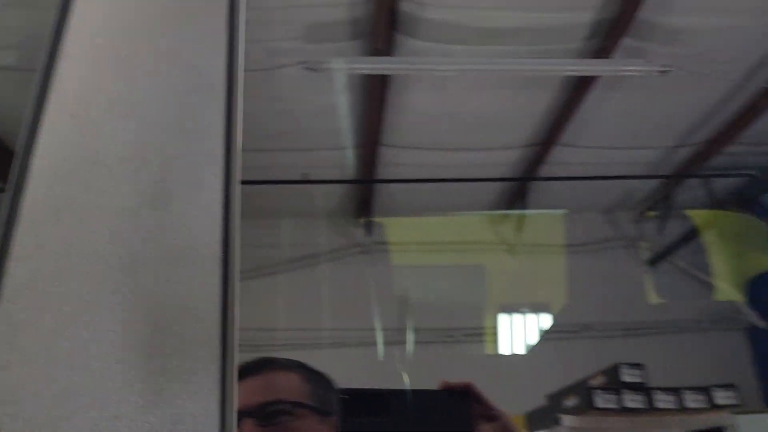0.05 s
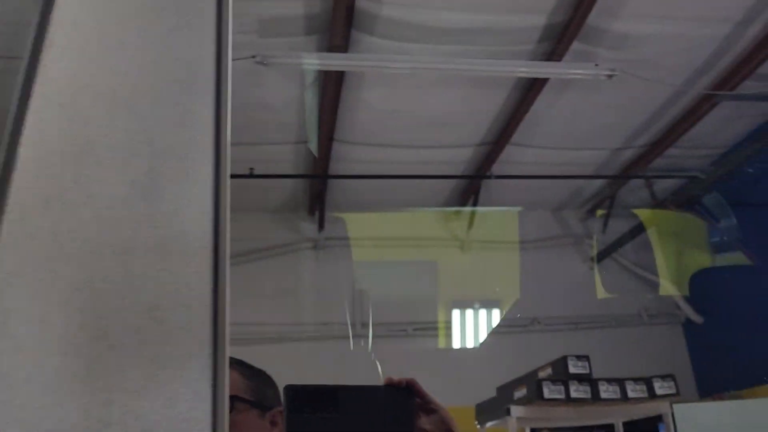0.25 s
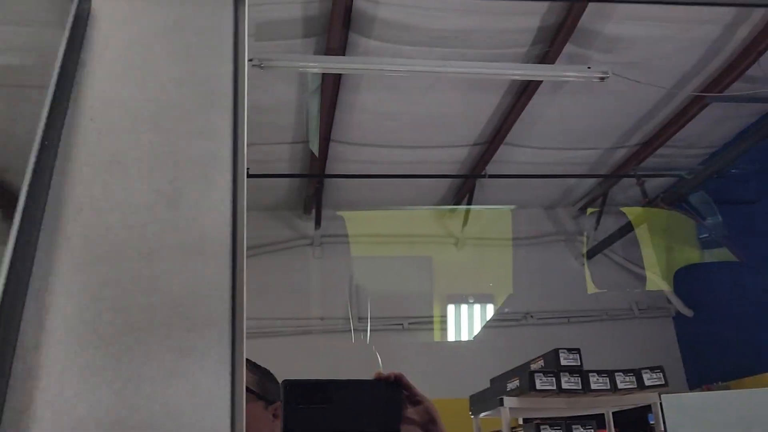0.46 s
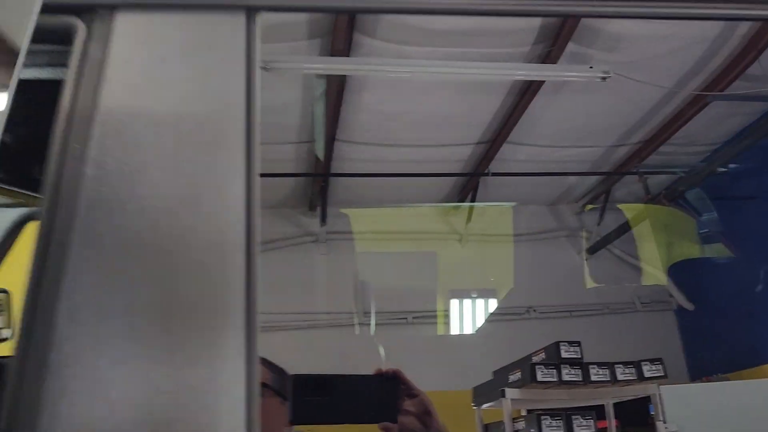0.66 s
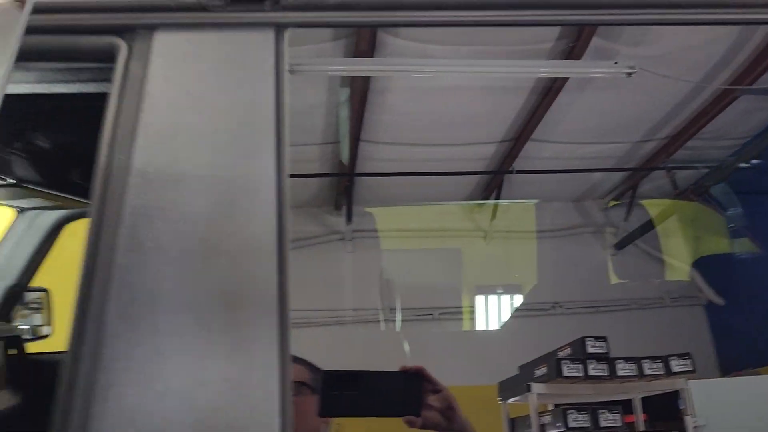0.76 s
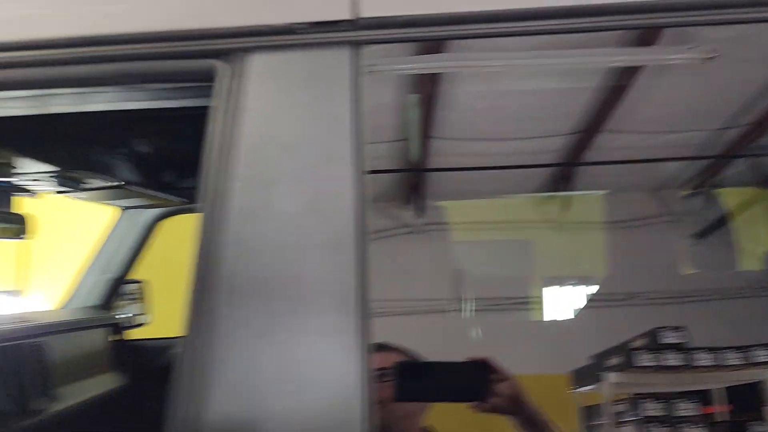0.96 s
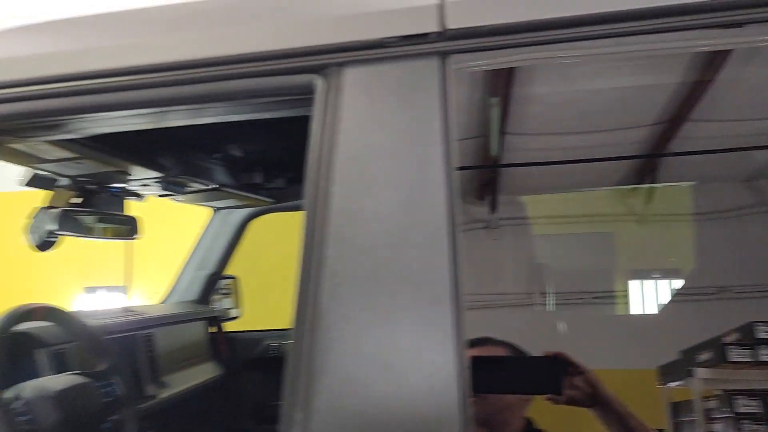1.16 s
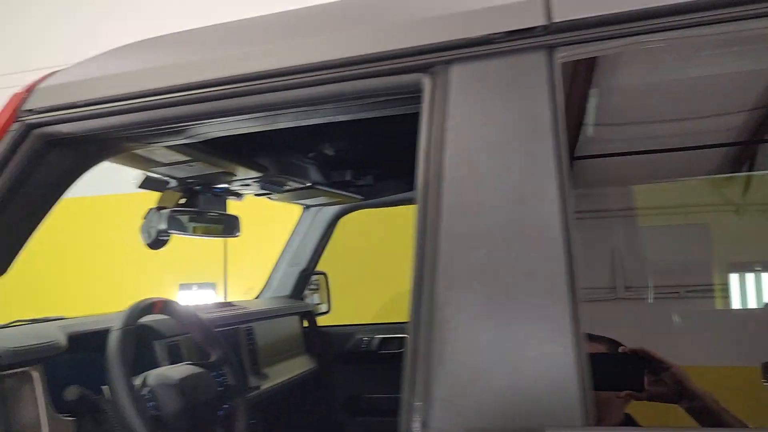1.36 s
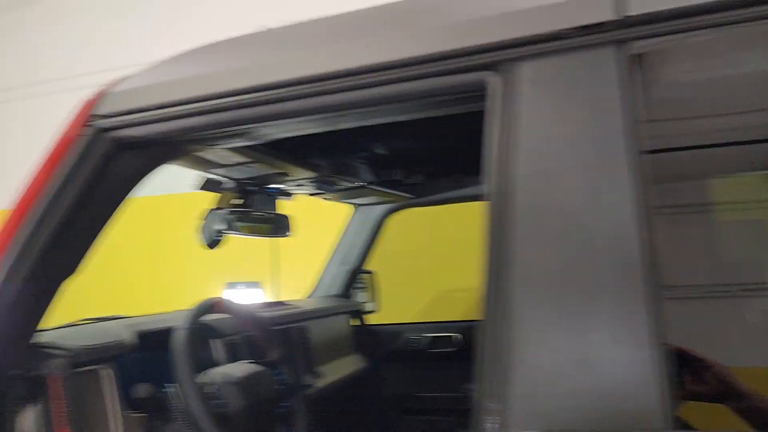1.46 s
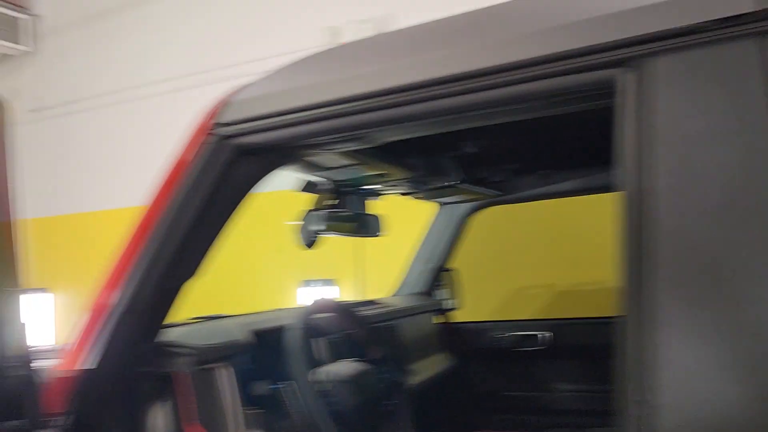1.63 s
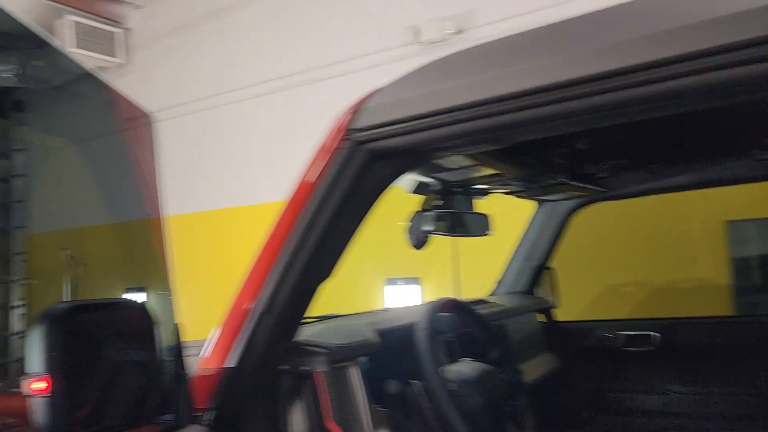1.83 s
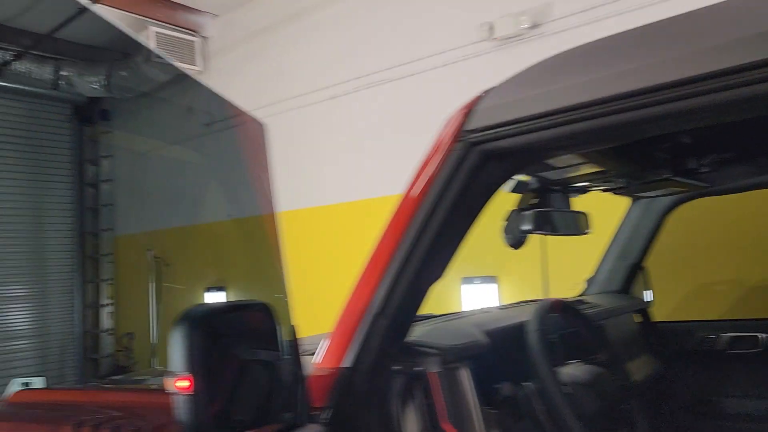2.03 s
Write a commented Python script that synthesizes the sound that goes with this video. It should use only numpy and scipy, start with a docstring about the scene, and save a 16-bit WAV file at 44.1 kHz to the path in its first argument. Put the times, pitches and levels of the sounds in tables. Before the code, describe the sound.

Close up in a humming, echoing workshop, a car door is pulled open. Small handle clicks lead to one loud metallic clunk with a low thump, then the door swings with soft rubbing and a small clack.

```python
"""A workshop with a steel-roofed hall's echo, the microphone close to a vehicle door being pulled open.
Over the ventilation hum the handle ticks, then the latch lets go with a thump and a steel crack;
the door panel rings on and the air in the cabin booms. The rubber seal peels off with a faint squeak,
and the door swings with a dry rub and a light rustle and bumps over its check strap."""
import sys
import numpy as np
from scipy import signal
from scipy.fft import rfft, irfft
from scipy.io import wavfile
from scipy.ndimage import uniform_filter1d

SR = 44100
rng = np.random.default_rng(int(sys.argv[2]) if len(sys.argv) > 2 else 0)


def master(y):
    """Save y as 16-bit WAV."""
    cut = np.clip(np.atleast_2d(y).T, -1, 1)
    pcm = np.round(cut * 32767)  # scale
    wavfile.write(sys.argv[1], SR, pcm.astype(np.int16))


N = 92257
TIME = np.arange(N) / SR
HZ = np.fft.rfftfreq(2 * N, 1 / SR)


def amp(db):
    """Decibels to gain."""
    return 10 ** (np.asarray(db) / 20)


def read(points, hz=HZ):
    """A table read on a log-frequency axis."""
    f, value = np.transpose(points)
    return np.interp(np.log(hz + 1), np.log(f + 1), value)


def add(mix, start_s, sound):
    """Mixes a sound in at its start time."""
    at = round(start_s * SR)
    sound = sound[..., max(-at, 0):]
    part = mix[:, max(at, 0):][:, :sound.shape[-1]]
    part += sound[..., :part.shape[1]]


def unit_rms(x):
    """Scales to an rms of 1."""
    return x / np.sqrt(np.mean(x ** 2) + 1e-20)


def unit_energy(x):
    """Scales each channel to an energy of 1."""
    return x / np.sqrt((x ** 2).sum(-1, keepdims=True) + 1e-20)


def hill(centre_hz, width):
    """The dB curve of a resonance; width is a share of its centre."""
    return -20 * np.log10(1 + (np.log((HZ + 1) / centre_hz) / width) ** 2)


def level(times, db):
    """Gain along a level curve, silent outside it."""
    return amp(np.interp(TIME, times, db, left=-np.inf, right=-np.inf))


# How alike the two sides are at the microphone. Each row: frequency in Hz, likeness from 0 to 1.
LIKENESS = [(40, 1), (150, 1), (280, 0.82), (550, 1), (1000, 0.29), (2000, 0.033), (16000, 0.017)]
def noise(db):
    """Two channels of coloured noise, alike in the bass."""
    left, other = rfft(rng.standard_normal((2, 2 * N)))
    same = np.clip(read(LIKENESS), 0, 1)
    right = same * left + np.sqrt(1 - same ** 2) * other
    return unit_rms(irfft(np.array([left, right]) * amp(db))[:, :N])


def burst(db, t60):
    """Fast-fading noise: a dense cluster of quickly dying modes."""
    return unit_energy(noise(db)[:, :SR] * amp(-60 * TIME[:SR] / t60))


def tail(db, t60s, rise_s):
    """A diffuse ring that swells and dies at its own speed in each band."""
    hz, t, bands = signal.stft(noise(db), SR, nperseg=512)
    decay = amp(-60 * t / read(t60s, hz)[:, None])
    fading = signal.istft(bands * decay, SR, nperseg=512)[1][:, :N]
    return unit_energy(fading * (1 - np.exp(-TIME / rise_s)))


def ring(modes, dull_db=0):
    """Struck modes; a soft blow favours the low ones by dull_db per octave."""
    t = TIME[:SR]
    return sum(amp(db - dull_db * np.log2(hz / 300) - 60 * t / t60) * np.sin(2 * np.pi * hz * t)
               for hz, db, t60 in modes)


def arch(length_s, peak_share=0.19):
    """A smooth, quick swell and a slower fade."""
    progress = np.arange(int(length_s * SR)) / (length_s * SR)
    return np.sin(np.pi / 2 * np.interp(progress, [0, peak_share, 1], [0, 1, 0]))


def rub(length_s, db, grain_db=2.5, grain_s=0.002):
    """Grainy friction under one stroke."""
    stroke = arch(length_s)
    grain = unit_rms(uniform_filter1d(rng.standard_normal(N), int(grain_s * SR)))
    friction = noise(db) * amp(grain_db * grain)
    return stroke * unit_rms(friction[:, :len(stroke)])


# Ventilation, all round the microphone. Each row: frequency in Hz, relative level in dB.
VENTILATION = [(18, -29), (35, -3.5), (55, 1.5), (95, -2), (130, -0.5), (180, -10.5), (260, -11),
               (350, -17.5), (470, -26.5), (620, -25), (800, -23.5), (1100, -29.5), (1550, -26),
               (1780, -30.5), (2050, -29), (2500, -37.5), (4200, -41.5), (5500, -51), (8000, -48),
               (11500, -62.5), (16000, -60)]
# Machine tones in the background. Each row: frequency in Hz, level in dB.
MACHINE_TONES = [(120, -52.5), (174, -57.5), (299, -63.5), (388, -64), (1001, -63), (1631, -66),
                 (2003, -71.5), (2998, -82)]
def workshop():
    """Room tone: ventilation rumble with faint, wavering machine tones."""
    out = amp(-42) * noise(read(VENTILATION))
    for hz, db in MACHINE_TONES:
        waver = np.interp(TIME, np.linspace(0, TIME[-1], 16), np.cumsum(rng.standard_normal(16)))
        out += amp(db) * np.sqrt(2) * np.sin(2 * np.pi * hz * TIME + 0.84 * waver)
    return out


# Handling, close up. Each row: start and length in seconds, level in dB, treble lift in dB per octave.
RUSTLE_STROKES = [(-.05, 0.33, -62, 2.5), (.14, 0.06, -61, 4), (0.315, 0.069, -41.5, 2.5),
                  (0.396, 0.045, -43.5, -7), (0.492, 0.018, -42.5, -8), (1.199, 0.084, -45, -4.5),
                  (1.239, .16, -58.5, 4), (1.575, .04, -71, -14), (1.673, 0.074, -64.5, 4.5),
                  (1.878, 0.042, -60, 0.5)]
# Colour of a rustle. Each row: frequency in Hz, relative level in dB.
RUSTLE_COLOUR = [(200, -3), (600, 6), (1200, -11.5), (2000, -1), (3000, -12), (7500, -21), (12500, -24.5),
                 (15500, -21.5)]
def rustles():
    """Light strokes of friction as the door is handled."""
    out = np.zeros((2, N))
    for start, length, db, lift_db in RUSTLE_STROKES:
        colour = read(RUSTLE_COLOUR) + lift_db * np.log2(1 + HZ / 4000)
        add(out, start, amp(db) * rub(length, colour))
    return out


# The linkage. Each row: start in seconds, level in dB, body resonance in Hz, snap against body in dB.
LINKAGE_TICKS = [(0.2969, -26.5, 5370, -8), (0.3079, -30, 7000, 10), (0.3183, -14.5, 1750, -1),
                 (0.3295, -32, 4000, 9), (0.3339, -24.5, 5800, 4), (0.342, -31, 4250, 11),
                 (.3530, -19.5, 2000, -0.5)]
# The snap of a tick. Each row: frequency in Hz, relative level in dB.
SNAP_COLOUR = [(1000, 11), (3000, 0), (6500, -11), (12000, -0.5), (15500, 3)]
# Handle, then check strap. Each row: start in seconds, level in dB, dullness in dB per octave.
CLACK_HITS = [(0.3148, 1.5, -1), (0.3164, -1, 10), (1.2181, -1.5, 5.5), (1.2244, -7, 10)]
# Modes of those small parts. Each row: frequency in Hz, level in dB, t60 in seconds.
CLACK_MODES = [(373, -36.5, 0.046), (532, -28, 0.018), (707, -36, 0.04), (992, -27.5, 0.018),
               (1738, -32.5, 0.032), (2220, -33.5, .015), (2360, -39, 0.017), (3300, -56, 0.01)]
def handle_and_strap():
    """The linkage ticks; the handle and later the check strap clack and ring briefly."""
    out = np.zeros((2, N))
    for start, db, hz, snap_db in LINKAGE_TICKS:
        body = burst(hill(hz, width=0.38), t60=0.016)
        snap = amp(snap_db) * burst(read(SNAP_COLOUR), t60=0.014)
        add(out, start, amp(db) * (body + snap))
    for start, db, dull_db in CLACK_HITS:
        add(out, start, amp(db) * ring(CLACK_MODES, dull_db))
    return out


# Knocks on the door. Each row: start in seconds, level in dB, dullness in dB per octave.
DOOR_KNOCKS = [(.366, -21.5, 1.5), (0.511, 1.5, -0.5), (.664, -14, 0), (1.2184, -22, -4.5),
               (1.249, -27, 7.5)]
# Modes of the panel, close to the microphone. Each row: frequency in Hz, level in dB, t60 in seconds.
PANEL_MODES = [(65.4, -21, 0.34), (122, -17.5, 0.34), (145, -30.5, 0.4), (172.7, -21, 0.33),
               (250, -24, 0.069), (299, -16, 0.12), (369.4, -25, 0.22), (439.4, -24.5, .12),
               (588, -30, 0.075), (709, -41.5, 0.38), (773, -33, 0.3), (894.5, -28.5, 0.11),
               (1045.4, -26, 0.12), (1377, -31.5, 0.19)]
# Trim and fittings inside the door. Each row: frequency in Hz, relative level in dB.
TRIM_COLOUR = [(150, -15), (350, 6), (600, -10), (1050, 2.5), (1400, -19), (2200, -29), (4000, -48),
               (9000, -40)]
def door(thump_s=0.5078, thump_hz=222.5):
    """The door jumps out of its seal in one push; the trim clatters and each knock rings the panel."""
    spread = (np.pi * thump_hz * (TIME - thump_s)) ** 2
    thump = amp(0.5) * (2 * spread - 1) * np.exp(-spread)  # a single pressure pulse
    out = np.tile(thump, (2, 1))
    for start, db, dull_db in DOOR_KNOCKS:
        add(out, start, -amp(db) * ring(PANEL_MODES, dull_db))
    add(out, 0.5125, amp(6) * burst(read(TRIM_COLOUR), t60=0.064))
    return out


# The latch pawl sliding just before release (first row), then the seal letting go. Each row: start and length
# in seconds, level in dB, bright spot in Hz, # its height in dB.
SEAL_PEELS = [(0.502, 0.032, -31, 1500, 11), (0.561, 0.031, -31.5, 2200, -2),
              (0.648, 0.015, -30.5, 4970, 10.5), (.657, 0.054, -34, 960, 7), (0.668, 0.031, -28, 3400, 8.5)]
# Colour of the peeling rubber. Each row: frequency in Hz, relative level in dB.
SEAL_COLOUR = [(150, 14), (330, 4.5), (600, -4), (1200, -4), (1800, -1.5), (2800, -13), (4300, -10),
               (5200, -29), (8000, -29), (15000, -49)]
def seal():
    """The latch pawl slides in one grainy stroke, then rubber peels off the frame in short, grainy strokes."""
    out = np.zeros((2, N))
    for start, length, db, spot_hz, spot_db in SEAL_PEELS:
        colour = read(SEAL_COLOUR) + spot_db * amp(hill(spot_hz, width=0.21))
        add(out, start, amp(db) * rub(length, colour))
    return out


# Steel meeting steel in the latch, at close range. Each row: start in seconds, level in dB.
LATCH_CONTACTS = [(.5110, -5.5), (.5119, -1), (.5140, -11.5), (.5172, -22.5)]
# Modes of the latch. Each row: frequency in Hz, level in dB, t60 in seconds.
LATCH_MODES = [(1786, -19.5, 0.098), (2084, -9, 0.012), (2456, -13, 0.013), (3640, -26, 0.064),
               (4020, -28, 0.062)]
# The crack of a contact. Each row: frequency in Hz, relative level in dB.
CRACK_COLOUR = [(400, 12), (1050, -1), (1550, -4.5), (2000, -1), (2450, 6), (2900, -14.5), (3700, 0),
                (5200, -9.5), (8000, -8.5), (11500, -13), (15500, -15.5)]
# The crack echoed back by the hall, stronger than for the nearer sounds. Each row: frequency in Hz, relative
# level in dB.
LATCH_ECHO_COLOUR = [(1000, -2), (2200, 0), (4000, -8.5), (8000, -19), (12000, -13), (15500, -14)]
# How long that echo of the crack rings. Each row: frequency in Hz, t60 in seconds.
LATCH_ECHO_DECAY = [(1000, 0.51), (5000, .45), (15000, .4)]
def latch():
    """The pawl slips off, the steel claw snaps against its stop, and the hall echoes the crack."""
    out = np.zeros((2, N))
    for start, db in LATCH_CONTACTS:
        crack = amp(6.5) * burst(read(CRACK_COLOUR), t60=0.023)
        add(out, start, amp(db) * (ring(LATCH_MODES) + crack))
    add(out, 0.522, amp(-6.5) * tail(read(LATCH_ECHO_COLOUR), LATCH_ECHO_DECAY, rise_s=0.005))
    return out


# Air modes of the cabin behind the door. Each row: frequency in Hz, level in dB, t60 in seconds.
CABIN_MODES = [(40.7, -24.5, 0.65), (59.8, -11, 0.27)]
# The cabin's boom. Each row: frequency in Hz, relative level in dB.
BOOM_COLOUR = [(25, -4), (42, 0), (65, -2.5), (90, -4.5), (130, 0.5), (180, -4), (300, -10.5), (500, -20),
               (1000, -26.5), (3000, -52.5)]
# How long it lasts. Each row: frequency in Hz, t60 in seconds.
BOOM_DECAY = [(40, 0.67), (150, 0.55), (500, 0.66)]
def cabin(jolt_s=0.512, swell_s=0.04):
    """The cabin air answers the jolt with two swelling low modes and a diffuse boom."""
    out = np.zeros((2, N))
    add(out, jolt_s, ring(CABIN_MODES) * (1 - np.exp(-TIME[:SR] / swell_s)))
    add(out, jolt_s, amp(11) * tail(read(BOOM_COLOUR), BOOM_DECAY, rise_s=0.0067))
    return out


# Hand and door, close up. Each row: start and length in seconds, level in dB, centre in Hz.
SOFT_BUMPS = [(0.616, 0.022, -32, 125), (1.19, 0.14, -42.5, 197), (1.246, 0.11, -35, 87),
              (1.569, 0.058, -42, 95), (1.684, 0.044, -42.5, 60.7), (1.822, 0.068, -35.5, 52)]
def bumps():
    """The hand and the door bump softly, each time a short swell of low noise."""
    out = np.zeros((2, N))
    for start, length, db, hz in SOFT_BUMPS:
        stroke = arch(length)
        treble_cut = 20 * np.log10(1 + (HZ / hz / 4) ** 2)
        rumble = noise(hill(hz, width=0.31) - treble_cut)[:, :len(stroke)]
        add(out, start, amp(db) * stroke * unit_rms(rumble))
    return out


# The seal's squeak. Each row: time in seconds, pitch in Hz, level in dB.
SQUEAK_GLIDE = [(.69, 681, -57), (0.716, 639, -51), (0.756, 595, -44.5), (.78, 565, -55), (0.804, 535, -49)]
def squeak():
    """The last of the rubber leaves the frame with a faint falling tone."""
    times, hz, db = np.transpose(SQUEAK_GLIDE)
    pitch = np.interp(TIME, times, hz)
    return level(times, db) * np.sin(2 * np.pi * np.cumsum(pitch) / SR)


# Rubbing as the door swings near the microphone. Each row: time in seconds, level in dB.
SWING_LEVEL = [(.815, -75), (.835, -48), (.94, -44.5), (1.05, -48), (1.08, -52.5), (1.182, -57)]
# Colour of the rub. Each row: frequency in Hz, relative level in dB.
SWING_COLOUR = [(400, -5.5), (750, -9.5), (1150, -10.5), (1550, -2), (2200, -5), (2600, -14.5),
                (3300, -14.5), (4300, -19.5), (5600, -24.5), (8000, -30), (13500, -35.5), (16000, -31)]
# Resonances in the rub. Each row: frequency in Hz, height in dB.
SWING_PEAKS = [(1640, 3), (1790, 0.5), (2020, 9), (4230, 6.5)]
def swing():
    """A dry rub with a few narrow resonances while the door moves."""
    peaks = sum(db * amp(hill(hz, width=0.042)) for hz, db in SWING_PEAKS)
    grain = unit_rms(uniform_filter1d(rng.standard_normal(N), size=300))
    friction = noise(read(SWING_COLOUR) + peaks) * amp(0.78 * grain)
    return level(*np.transpose(SWING_LEVEL)) * unit_rms(friction)


# What comes back from the hall. Each row: frequency in Hz, relative level in dB.
HALL_COLOUR = [(100, -29.5), (400, -9.5), (1000, -12), (2200, -11), (4000, -8.5), (8000, -5.5),
               (15000, -13)]
# How long the hall rings. Each row: frequency in Hz, t60 in seconds.
HALL_DECAY = [(150, 1.03), (1000, 0.88), (3000, 1.06), (6000, 1.01), (11000, .55), (16000, 0.93)]
def hall(near, delay_s=0.016):
    """The long echo of a steel-roofed hall, arriving just after the direct sound."""
    echo = np.zeros((2, N))
    add(echo, delay_s, tail(np.zeros_like(HZ), HALL_DECAY, rise_s=0.0013))
    spectrum = rfft(near, 2 * N) * rfft(echo, 2 * N) * amp(read(HALL_COLOUR))
    return amp(-4.5) * irfft(spectrum)[:, :N]


def scene():
    """The door and the hand on it up close, with the hall's echo and room tone behind."""
    near = handle_and_strap() + latch() + door() + cabin()
    near += seal() + squeak() + swing() + rustles() + bumps()
    return near + hall(near) + workshop()


# Balance at the microphone. Each row: frequency in Hz, left minus right in dB.
PORT_BALANCE = [(40, 4), (80, -2.1), (150, 2), (280, 1.5), (550, 1), (1100, -1.5), (1800, -4), (2500, 0),
                (4000, 2.5), (8000, 5.5), (14000, -5.5)]
# The microphone's colour. Each row: frequency in Hz, gain in dB.
MIC_COLOUR = [(5000, 0), (6300, 1), (7500, 3), (8300, 0), (9000, -5), (10100, -3.5), (11400, 3.5),
              (15000, -0.5), (16000, -7)]
def record(dry, left_lead_s=0.0003666, edge_hz=16050):
    """Two microphone ports, the left nearer the door; their colour, clipping and the band limit."""
    tilt = amp(read(PORT_BALANCE) / 2)
    ports = np.array([tilt, np.exp(-2j * np.pi * HZ * left_lead_s) / tilt])
    picked_up = irfft(rfft(dry, 2 * N) * ports * amp(read(MIC_COLOUR)))[:, :N]
    lowpass = signal.firwin(511, edge_hz, window=("kaiser", 9), fs=SR)
    return signal.oaconvolve(np.clip(picked_up, -1, 1), lowpass[None], "same")


dry = scene()
out = record(dry)
master(out)
```